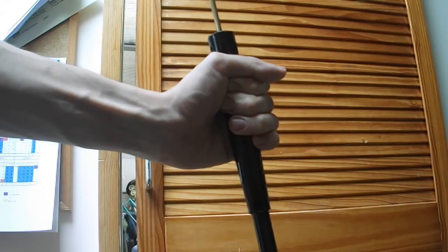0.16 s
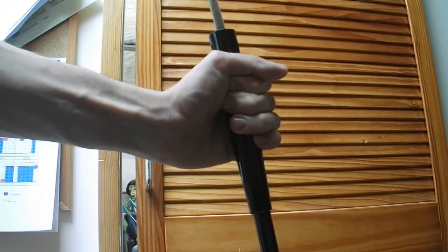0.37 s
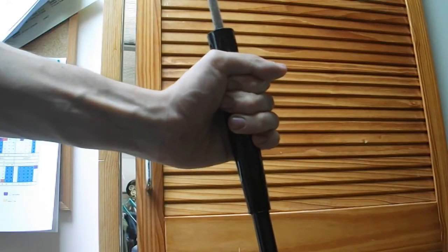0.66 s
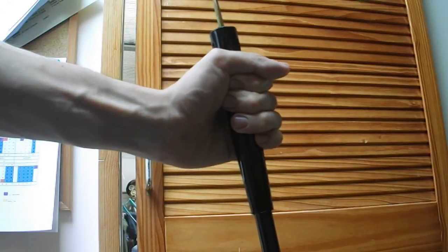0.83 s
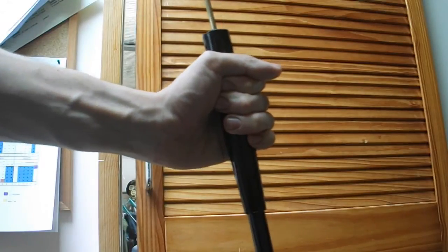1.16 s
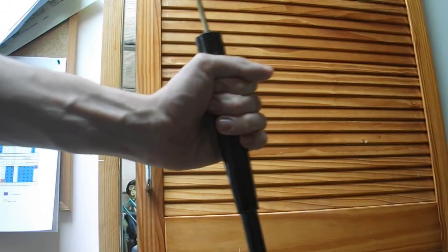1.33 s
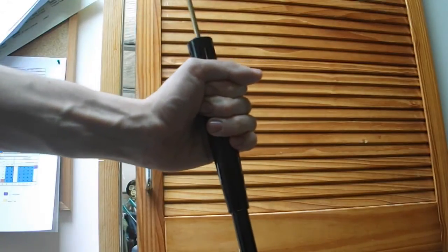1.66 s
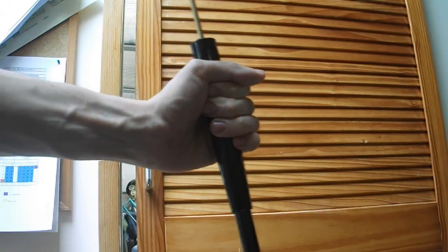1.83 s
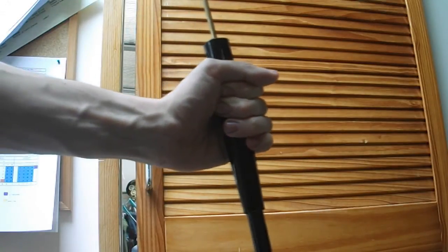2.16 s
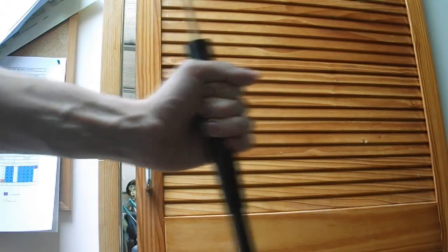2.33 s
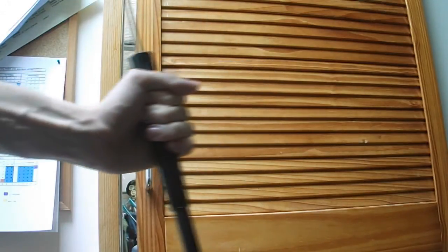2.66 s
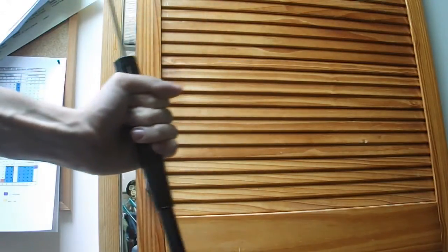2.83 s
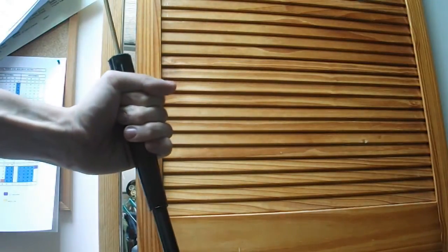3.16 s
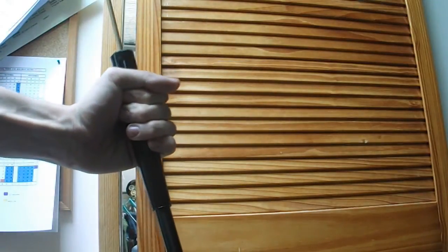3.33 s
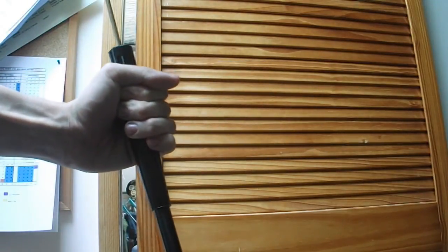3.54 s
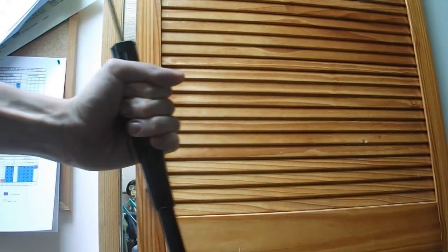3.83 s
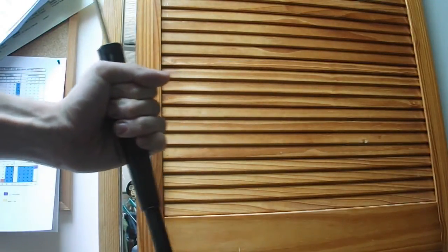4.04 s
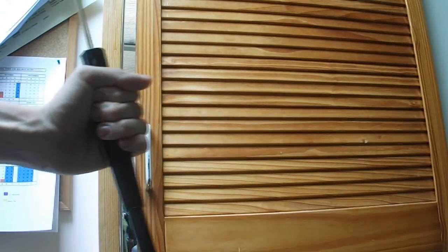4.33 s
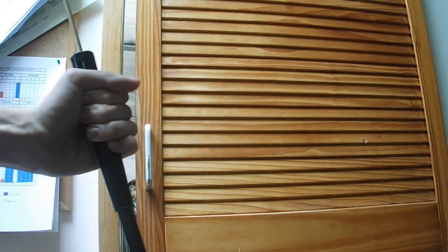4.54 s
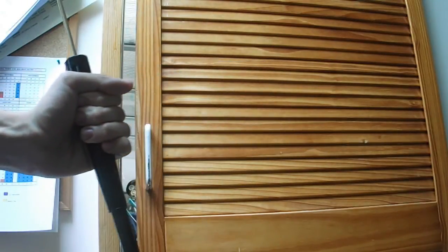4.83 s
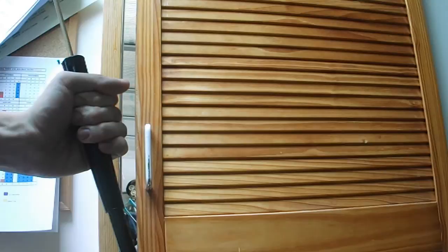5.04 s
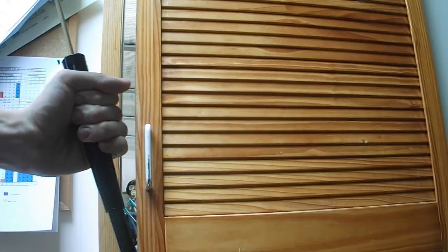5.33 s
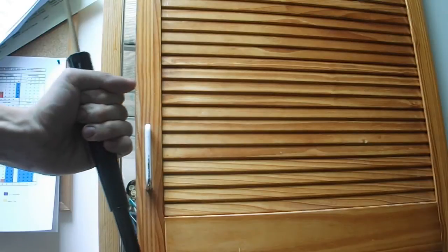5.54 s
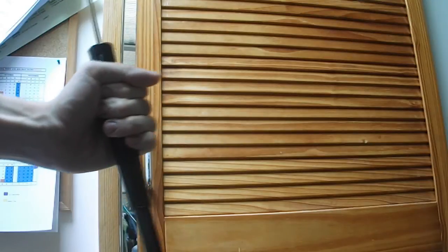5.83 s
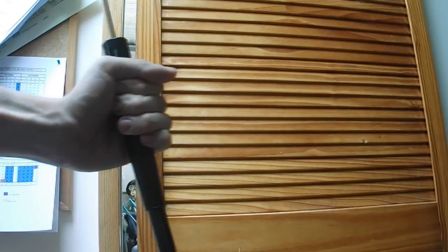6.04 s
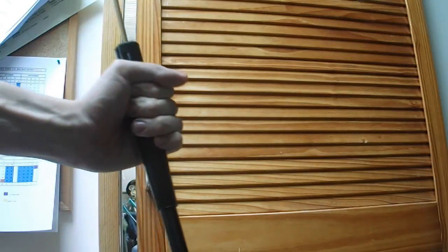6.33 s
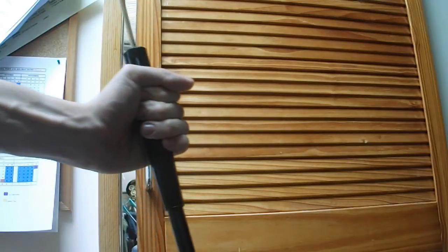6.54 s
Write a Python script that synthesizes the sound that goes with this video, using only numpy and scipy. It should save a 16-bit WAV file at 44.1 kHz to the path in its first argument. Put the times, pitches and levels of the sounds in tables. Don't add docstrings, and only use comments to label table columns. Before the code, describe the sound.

Dry raspy scraping and brief squeals of a rod in a metal tube, broken by hard metallic knocks, faint ticks and quiet gaps.

```python
import sys
import numpy as np
from scipy import signal
from scipy.fft import rfft, irfft
from scipy.io import wavfile
from scipy.ndimage import uniform_filter1d

SR = 44100
rng = np.random.default_rng(int(sys.argv[2]) if len(sys.argv) > 2 else 0)


def generate_wav(signal):
    frames = np.transpose(np.atleast_2d(signal))
    scaled = np.clip(frames, -1, 1) * 32767
    pcm = np.round(scaled).astype(np.int16)
    wavfile.write(sys.argv[1], SR, pcm)


def amplitude_ratio(level_db):
    exponent = np.asarray(level_db, float) / 20
    return 10 ** exponent


N = 295029

# f/Hz, width/Hz, level/dB
BARREL_MODES = [(790, 39.4, -6), (1123, 225, 0.5), (1620, 246, 7.5), (2310, 170, 3), (2780, 585, 4.5),
                (3300, 620, 1.5), (3944, 480, 5), (4057, 35, -20), (5283, 268, 1.5), (5750, 450, 3),
                (7445, 870, -3), (7800, 280, -11), (8710, 200, -11.5), (9500, 680, -15)]
# f/Hz, width/Hz, level/dB
LONG_RINGS = [(1630, 17, -10.5), (2780, 45, 2.5), (4220, 48, -4.5), (5550, 22, -15.5)]


def evened(x):
    return x / np.sqrt(np.mean(x ** 2) + 1e-20)


def read(points, hz):
    f, value = np.transpose(points)
    return np.interp(np.log(hz + 1), np.log(f + 1), value)


def add(mix, s, sound):
    part = mix[round(s * SR):][:len(sound)]
    part += sound[:len(part)]


def resonate(x, hz, width, order=1):
    turn = np.exp(2j * np.pi * np.cumsum(hz * np.ones(len(x))) / SR)
    r = np.exp(-np.pi * width / SR)
    envelope = signal.lfilter([(1 - r) ** order], np.poly([r] * order), x / turn)
    return 2 * (turn * envelope).real


def coloured(x, gain):
    return irfft(rfft(x) * gain(np.fft.rfftfreq(len(x), 1 / SR)), len(x))


def drift(per_s):
    knots = rng.standard_normal(int(N / SR * 60))
    return evened(np.interp(np.arange(N) / SR * per_s, np.arange(len(knots)), knots))


def background():
    # f/Hz, level/dB per Hz
    air_spectrum = [(8.8, -15), (15, 5), (59, -8), (75, -22.5), (92, -15.5), (142, -16), (175, -26.5),
                    (208, -25), (263, -28.5), (846, -36.5), (1610, -41.5), (9300, -48), (11400, -39),
                    (12500, -53), (16200, -52.5)]
    # f/Hz, width/Hz, level/dB
    hum_lines = [(105.25, 3.2, -56.5), (142.4, 13.4, -60.5), (216.7, 5.7, -69.5)]
    # f/Hz, level/dB
    whines = [(10008, -84), (10083, -71), (10160, -72), (10239, -81), (11377, -59.5), (15278, -81)]
    # t/s, phase/turns
    phase_skips = [(0, -.5), (.4, -.45), (.8, 0), (2.5, 0), (2.85, -.5), (3.08, -1), (3.4, -1.5), (3.7, -2),
                   (4.1, -2), (4.5, -1.5), (5.8, -1.5), (6.25, -1), (6.69, -.8)]
    air_db, restarts_per_s = -57, 30
    t = np.arange(N) / SR
    noise = coloured(rng.standard_normal(N), lambda hz: amplitude_ratio(read(air_spectrum, hz)) * (hz < 16100))
    middle = coloured(noise, lambda hz: (hz > 200) & (hz < 9500))
    out = amplitude_ratio(air_db) * noise / middle.std()
    for hz, width, db in hum_lines:
        out += amplitude_ratio(db) * evened(resonate(rng.standard_normal(N), hz, width, order=2))
    restart = np.diff(np.floor(t * restarts_per_s), prepend=0)
    skipped = np.cumsum(restart * np.interp(t, *np.transpose(phase_skips)))
    loudest = max(db for hz, db in whines)
    for hz, db in whines:
        turns = hz * t + (db == loudest) * skipped + rng.random()
        out += amplitude_ratio(db) * np.sqrt(2) * np.sin(2 * np.pi * turns)
    return out


def swell(t, start, fullest, end, db, hz, fall_db):
    rise_power, sag_hz_per_s = 1.3, 3300
    climb = np.clip((t - start) / max(fullest - start, .002), 1e-3, 1)
    rise = np.sin(np.pi / 2 * climb) ** rise_power
    fade = np.clip((t - fullest) / max(end - fullest, .002), 0, 1)
    level_db = db + 20 * np.log10(rise) + fall_db * fade
    return start, end, level_db, hz - sag_hz_per_s * np.clip(t - fullest, -.03, .03)


def contacts(t):
    # start t/s, fullest t/s, end t/s, level/dB, favoured f/Hz
    drags = [
        (-.02, 0, 0.093, -45.5, 3680),
        (.105, .115, .15, -50, 3700),
        (.155, .17, 0.21, -52.5, 3700),
        (.895, .91, 1.07, -44.5, 3900),
        (.95, .96, 0.95, -29, 2470),
        (3.855, 3.866, 3.905, -47, 2730),
        (5.565, 5.572, 5.605, -50.5, 2700),
    ]
    brushes = [
        (0.265, 0.304, 0.56, -61.5, 3496),
        (0.622, .635, 0.78, -71, 3200),
        (.72, .86, .885, -64.5, 2920),
    ]
    squeals = [
        (.914, .928, 0.97, -31.5, 3110),
        (3.903, 3.92, 3.952, -47.5, 2320),
        (4.29, 4.32, 4.35, -32, 2310),
    ]
    slides = [
        (2.29, 2.49, 2.61, -67, 3110),
        (2.94, 3.07, 3.125, -44, 3060),
        (3.21, 3.29, 3.44, -57.5, 3210),
        (3.31, 3.44, 3.517, -49, 3220),
        (4.252, 4.292, 4.34, -44, 2420),
        (4.432, 4.448, 4.49, -43, 2610),
        (5.602, 5.635, 5.685, -49.5, 2660),
        (5.68, 5.72, 5.755, -36, 3880),
        (5.772, 5.798, 5.84, -41, 2500),
        (5.822, 5.845, 5.89, -44.5, 2760),
    ]
    glides = [
        (3.895, 4.01, 4.128, -44.5, 3510),
        (4.375, 4.42, 4.447, -49, 2560),
    ]
    # t/s, level/dB, favoured f/Hz, extra cloth level/dB
    push = [
        (1.03, -55, 3630, 2.5),
        (1.189, -41, 4100, 0),
        (1.334, -44.5, 3200, -9),
        (1.42, -49.5, 3767, 6),
        (1.554, -41.5, 4000, 6.5),
        (1.6, -37, 3570, -7),
        (1.638, -42.5, 3840, 4),
        (1.669, -37.5, 4000, 1.5),
        (1.704, -38.5, 3840, 6),
    ]
    pull = [
        (5.87, -49.5, 3300, 2),
        (5.945, -41, 4160, -4.5),
        (6.045, -41, 4030, 3),
        (6.1, -43, 3140, -3),
        (6.14, -37.5, 2750, -8),
        (6.19, -43.5, 3060, 1),
        (6.41, -58, 3340, -3),
        (6.516, -53, 3080, -3.5),
    ]
    shakes = [
        (.225, -39, 4100, -2),
        (1.001, -34.5, 3450, 1),
        (1.742, -35.5, 3130, -0.5),
        (3.124, -31.5, 3700, -2),
        (4.168, -29.5, 2680, -5.5),
        (4.474, -33.5, 2920, 3),
        (6.553, -41.5, 2780, -1),
    ]
    # low bending/dB, upper ring/dB, cloth fizz/dB
    slide_colour = (-10, -5, -7.5)
    brush_colour = (-14.5, -3, 2.3)
    shake_colour = (-6.5, -4, -9.5)
    drag_colour = (-1.2, -7, -9.5)
    squeal_colour = (-7.5, -14.5, -16.5)
    slide_fall_db, glide_fall_db, brush_fall_db = -12.5, -2.5, -6
    shake_db_per_s, shake_s = 326, .14
    kinds = [(slides, slide_fall_db, slide_colour),
             (drags, slide_fall_db, drag_colour),
             (squeals, slide_fall_db, squeal_colour),
             (glides, glide_fall_db, slide_colour),
             (brushes, brush_fall_db, brush_colour)]
    for rows, fall_db, colour in kinds:
        for row in rows:
            yield *swell(t, *row, fall_db), colour, 0
    for s, db, hz, cloth_db in shakes:
        decay_db = db - shake_db_per_s * np.maximum(t - s, 0)
        yield s - .01, s + shake_s, decay_db, hz, shake_colour, cloth_db
    for rows in push, pull:
        s, db, hz, cloth_db = np.transpose(rows)
        yield (s[0] - .01, s[-1], np.interp(t, s, db), np.interp(t, s, hz),
               slide_colour, np.interp(t, s, cloth_db))


def rubbing():
    # low, upper, fizz [dB per dB]
    soft_share = (0.22, 0.17, 0.067)
    firm_db = -49
    t = np.arange(0, N / SR + .002, .001)
    gains = np.zeros((4, len(t)))
    pitch_sum, weight = 3000e-12, 1e-12
    for start, end, db, hz, colour, cloth_db in contacts(t):
        gate = np.clip(np.minimum(t - start, end + .02 - t) / .01, 0, 1)
        level = gate * amplitude_ratio(db)
        softness_db = firm_db - np.maximum(db, -70)
        low, upper, fizz = (amplitude_ratio(c + share * softness_db) for c, share in zip(colour, soft_share))
        gains += level * np.array([low, 1 + 0 * t, upper * amplitude_ratio(0.53 * cloth_db), fizz * amplitude_ratio(cloth_db)])
        pitch_sum = pitch_sum + hz * level ** 2
        weight = weight + level ** 2
    return [np.interp(np.arange(N) / SR, t, v) for v in (*gains, pitch_sum / weight)]


def scrape():
    # f/Hz, level/dB per Hz
    cloth_spectrum = [(290, -51), (500, -18.5), (1980, -2), (2770, -16), (3650, -41), (4150, 1), (4870, -4),
                      (5710, -9.5), (11800, -18.5), (16000, -45.5)]
    band_edges = [2000, 4800, 6600]
    *gains, favoured_hz = rubbing()
    grip = amplitude_ratio(1.8 * drift(30))
    bands = np.zeros((4, N))
    for hz, width, db in BARREL_MODES:
        slip_db = 2.5 * np.minimum(rng.exponential(1, N), 5) + 3.0 * drift(55)
        slips = rng.standard_normal(N) * amplitude_ratio(slip_db)
        near_db = 7 * np.exp(-((hz - favoured_hz) / 400) ** 2)
        mode = evened(resonate(slips, hz * (1 + .014 * drift(9)), .95 * width, order=2))
        bands[np.searchsorted(band_edges, hz)] += amplitude_ratio(db + near_db + 3.6 * drift(12)) * mode
    squeak = rng.standard_normal(N) * amplitude_ratio(1.1 * drift(50))
    bands[1] += amplitude_ratio(-2) * evened(resonate(squeak, favoured_hz, 160, order=2))
    bands /= np.sqrt(uniform_filter1d(bands ** 2, 3500))
    hiss = coloured(rng.standard_normal(N), lambda hz: amplitude_ratio(read(cloth_spectrum, hz)))
    edges = [0, *band_edges, SR]
    out = 0
    for k, hiss_db in enumerate([-6, -9, -8, -3]):
        part = coloured(hiss, lambda hz: (hz >= edges[k]) & (hz < edges[k + 1]))
        out = out + gains[k] * evened(evened(bands[k]) + amplitude_ratio(hiss_db) * evened(part))
    out = grip * out
    long_ring = sum(resonate(out, hz, 0.63 * width) for hz, width, db in LONG_RINGS)
    return out + amplitude_ratio(-3) * long_ring


def room(x):
    # f/Hz, t60/s
    decay_times = [(250, 0.12), (700, 0.25), (1800, 0.091), (5000, 0.061), (12000, 0.068)]
    taps = np.zeros(SR // 2)
    at = np.arange(160, len(taps) - 20, 12) + rng.integers(0, 12, (len(taps) - 169) // 12)
    taps[at] = rng.choice([-1., 1.], len(at))
    hz, t, z = signal.stft(taps, SR, nperseg=128)
    decay = amplitude_ratio(-60 * t / read(decay_times, hz)[:, None])
    tail = signal.istft(z * decay, SR, nperseg=128)[1]
    tail[:160] = 0
    return signal.fftconvolve(x, tail / np.linalg.norm(tail))[:N]


def struck(blow, hz, width):
    ring = resonate(blow, hz, width, order=2)
    return ring * np.linalg.norm(blow) * np.sqrt(np.pi * width / (2 * SR)) / np.linalg.norm(ring)


def knock(s, peak_db, strongest_hz, high_db, chatter_ms, low_db, edge):
    t = np.arange(3000) / SR
    chatter = np.exp(-(t * 1000 / max(chatter_ms, .1)) ** 2) * np.minimum(t / 0.00067, 1)
    blow = rng.standard_normal(len(t)) * chatter * 0.69
    blow[0] += edge
    ring = amplitude_ratio(9.0) * struck(blow, strongest_hz, 450)
    ring += edge * (amplitude_ratio(-13.5) * resonate(blow, strongest_hz, 2100) + amplitude_ratio(high_db - 27.5) * blow)
    for hz, width, db in BARREL_MODES:
        if hz < 1300:
            tilt_db = low_db - 6
        elif hz < 2000:
            tilt_db = low_db
        else:
            tilt_db = high_db if hz > 4800 else 0
        ring += amplitude_ratio(db + tilt_db) * struck(blow, hz, 1.35 * width)
    for hz, width, db in LONG_RINGS:
        ring += edge * amplitude_ratio(db) * resonate(blow, hz, width)
    return s, amplitude_ratio(peak_db) * ring / abs(ring).max()


def thud(s, peak_db, hz, t60):
    t = np.arange(6000) / SR
    shove = rng.standard_normal(len(t)) * amplitude_ratio(-60 * t / t60)
    swing = resonate(shove, 1.0 * hz, 0.67 * hz, order=2)
    swing += resonate(shove, 1.255 * hz, .9 * hz, order=2)
    swing += amplitude_ratio(-6) * resonate(shove, 2.6 * hz, 1.3 * hz, order=2)
    swing += amplitude_ratio(-8) * resonate(shove, .55 * hz, 0.5 * hz, order=2)
    return s, amplitude_ratio(peak_db - 2.5) * swing / abs(swing).max()


def scene():
    # t/s, peak level/dB, strongest f/Hz, high level/dB against the middle
    ticks = [(0.111, -38, 3690, -8), (0.1622, -42, 4130, -6), (1.5184, -45, 4040, -12),
             (1.6526, -32, 3960, -9), (1.8793, -40.5, 3220, -13), (2.3291, -44.5, 1120, 1),
             (2.5394, -44, 3780, -18), (2.7364, -50, 1110, 15.5), (2.9617, -38, 1630, -12),
             (3.353, -37, 1000, -9), (3.712, -45, 2620, -8), (3.8142, -31, 3120, -28.5),
             (3.855, -34, 3130, -19), (3.912, -39, 2370, -19), (4.295, -28, 2320, -2),
             (4.4398, -35, 3180, 18), (4.6105, -42, 4550, 4), (4.938, -48.5, 3521, -7),
             (4.968, -43.5, 3560, 8), (5.704, -32, 2800, -12), (5.786, -37, 2270, -19),
             (5.8406, -33, 2350, -14), (6.1267, -27, 2740, 4), (6.477, -39, 1670, -17)]
    knocks = [(0.199, -22, 3980, -5, 2.2), (0.2044, -7.5, 3970, -8.5, 3), (0.2139, -21, 2820, -3, 6.7),
              (0.2246, -29, 4000, 13, 1.9), (0.9014, -25.5, 4000, 1.1, 2.8), (.9212, -18.5, 3200, -8, 3.5),
              (0.9523, -15.5, 2500, -14, 1.7), (3.847, -24, 2400, -9, 2), (4.4574, -8.5, 4260, 7.5, 4.4),
              (5.428, -29.5, 3300, -19, 1), (5.5066, -28, 2460, -2, 2.25), (5.57, -29, 1620, -22, 0.84),
              (6.5382, -17.5, 2140, -7, 3.6)]
    # t/s, peak level/dB, strongest f/Hz, high level/dB, low level/dB
    stops = [
        (0.9853, -2, 2750, 4.5, -6.5),
        (1.586, -1.5, 3980, -2, -4),
        (1.72, -1.5, 3304, 1.8, -5.5),
        (3.11, -0.9, 3050, 5.5, 0.5),
        (4.1401, -3.5, 3630, -0.5, -5),
        (4.462, -7.5, 3160, 6.5, -8),
    ]
    # t/s, peak level/dB, f/Hz, t60/s
    thuds = [
        (.9855, -32, 430, .06),
        (1.586, -30, 430, .06),
        (1.72, -20, 290, .07),
        (3.11, -28, 450, .06),
        (4.14, -38, 400, .05),
        (4.4585, -15, 260, .07),
        (6.5385, -42, 330, .05),
    ]
    # f/Hz, level/dB
    metal_colour = [(300, -30.5), (800, 1), (8000, -0.5), (11000, -0.5), (14000, -4), (16000, -27),
                    (16500, -25), (16700, -76)]
    hits, shoves, rub = np.zeros(N), np.zeros(N), scrape()
    for row in ticks:
        add(hits, *knock(*row, chatter_ms=2, low_db=-8.5, edge=0.063))
    for row in knocks:
        add(hits, *knock(*row, low_db=-4.5, edge=0.99))
    for s, peak_db, hz, high_db, low_db in stops:
        add(hits, *knock(s, peak_db, hz, high_db, 1.27, low_db, edge=1.12))
    for row in thuds:
        add(shoves, *thud(*row))
    metal = hits + rub + room(amplitude_ratio(-9.0) * hits + amplitude_ratio(-15.0) * rub)
    metal = coloured(metal, lambda hz: amplitude_ratio(read(metal_colour, hz)))
    return (metal + shoves + amplitude_ratio(-16) * room(shoves) + background())[None]


def band_limit(x):
    return signal.sosfilt(signal.butter(12, 16660, fs=SR, output="sos"), x)


def record(dry):
    return band_limit(dry)


dry = scene()
out = record(dry)
generate_wav(out)
```